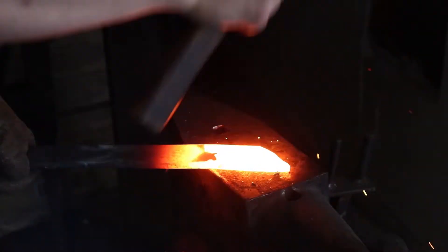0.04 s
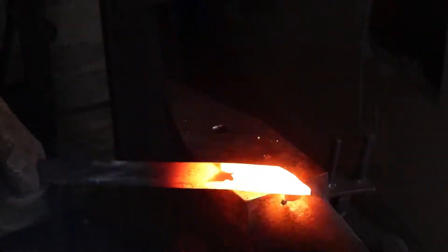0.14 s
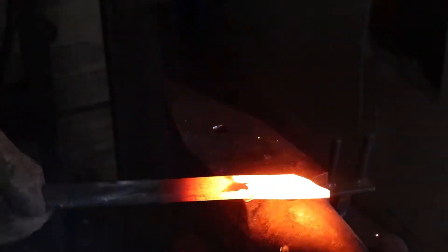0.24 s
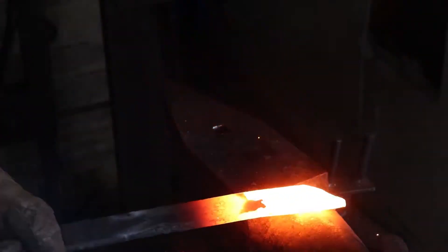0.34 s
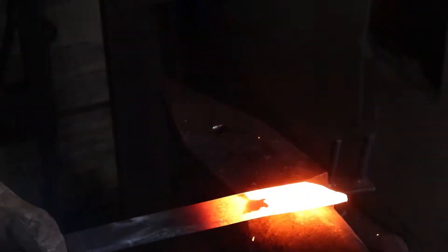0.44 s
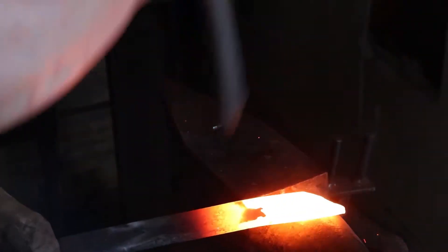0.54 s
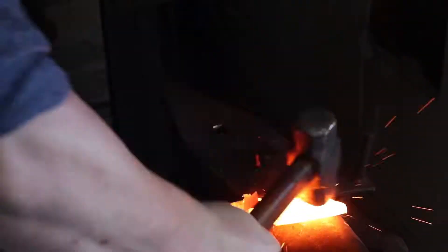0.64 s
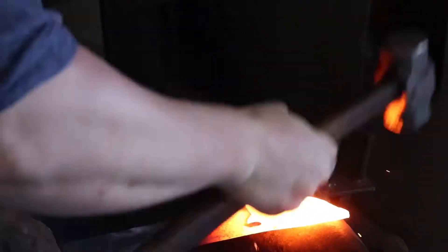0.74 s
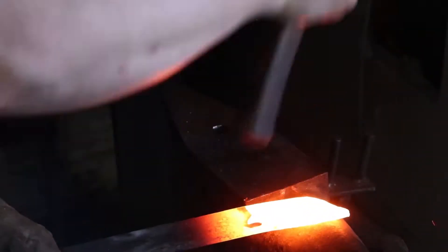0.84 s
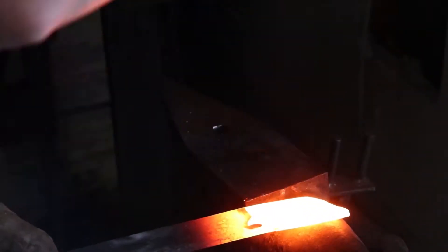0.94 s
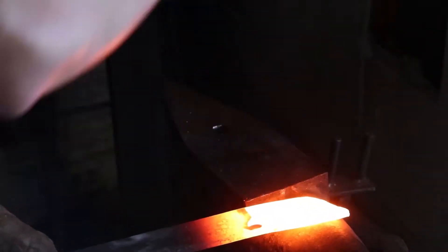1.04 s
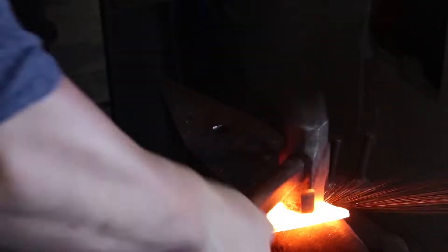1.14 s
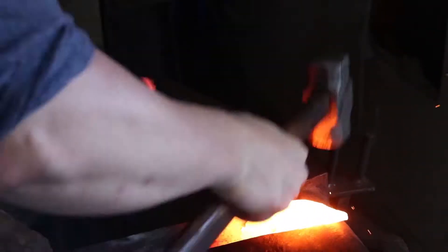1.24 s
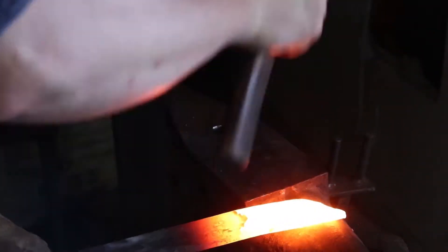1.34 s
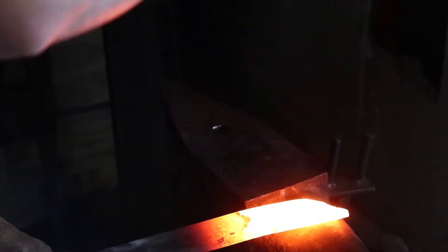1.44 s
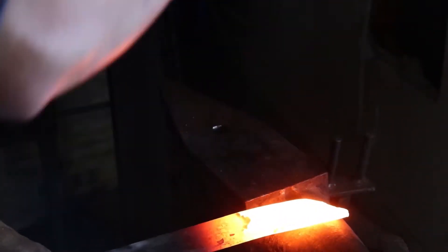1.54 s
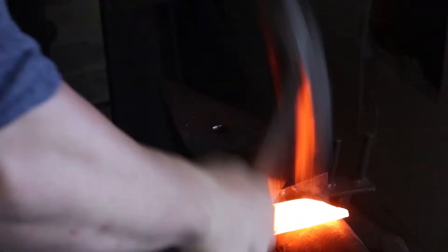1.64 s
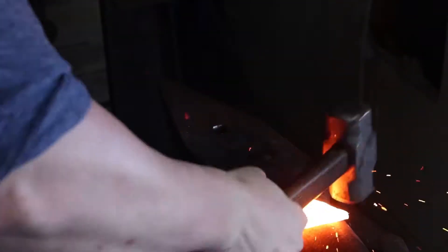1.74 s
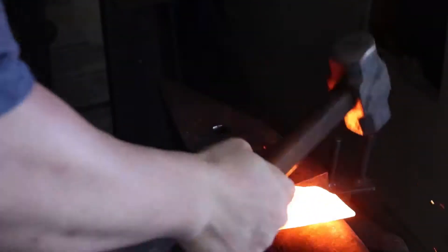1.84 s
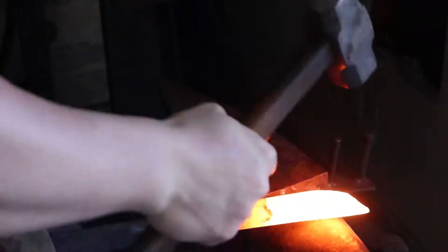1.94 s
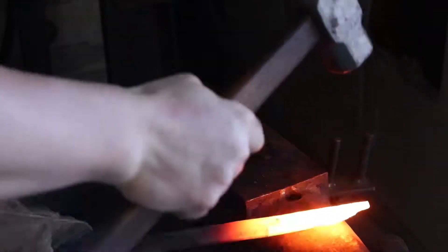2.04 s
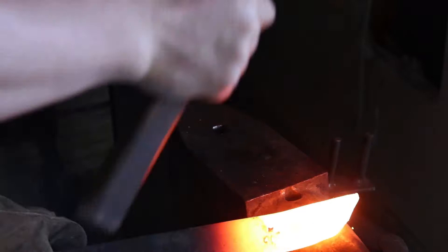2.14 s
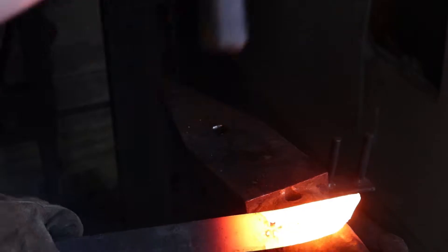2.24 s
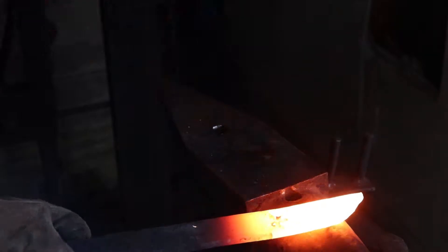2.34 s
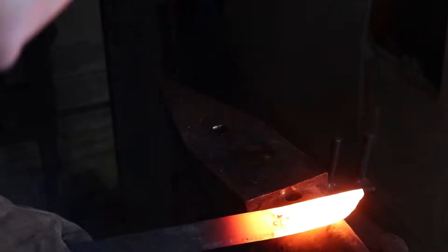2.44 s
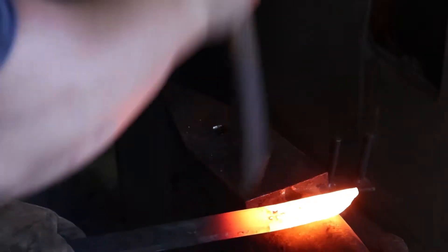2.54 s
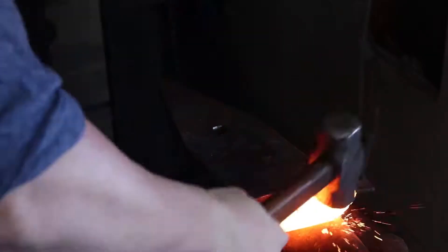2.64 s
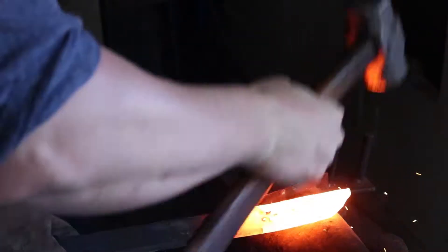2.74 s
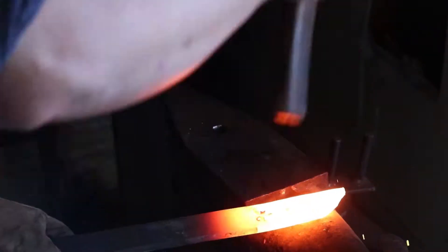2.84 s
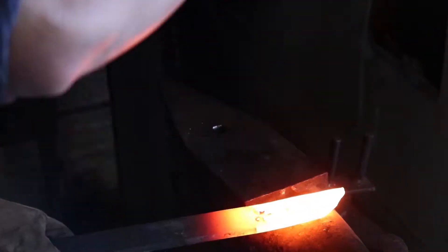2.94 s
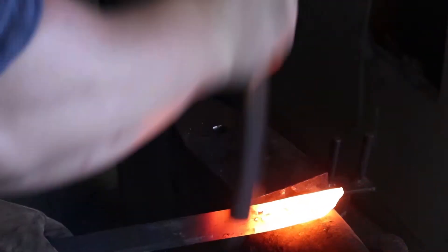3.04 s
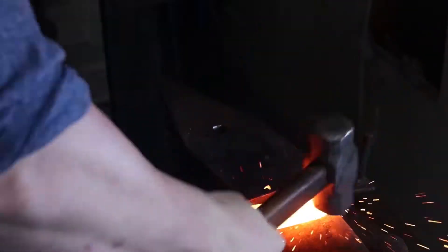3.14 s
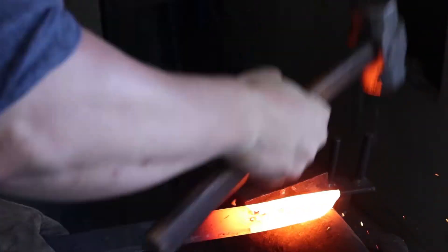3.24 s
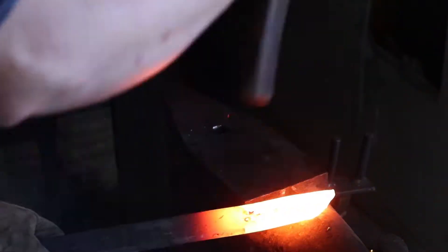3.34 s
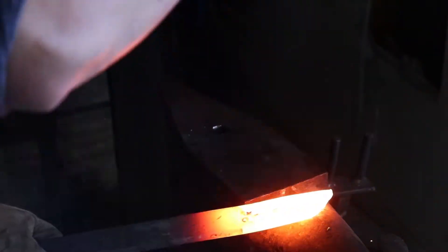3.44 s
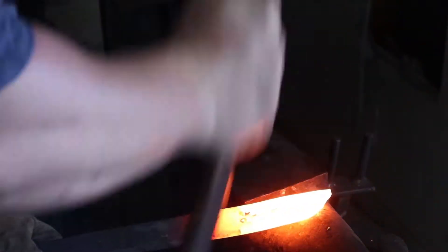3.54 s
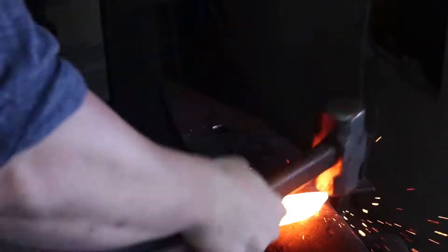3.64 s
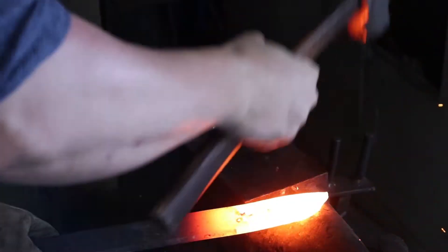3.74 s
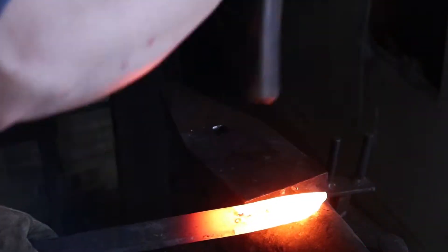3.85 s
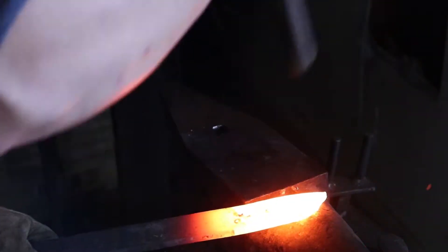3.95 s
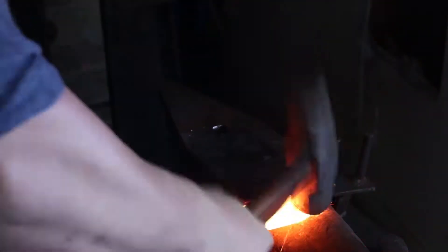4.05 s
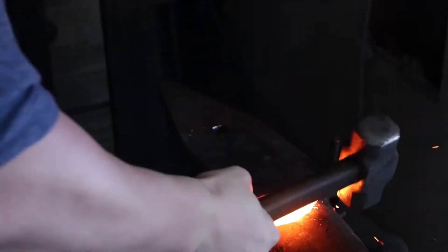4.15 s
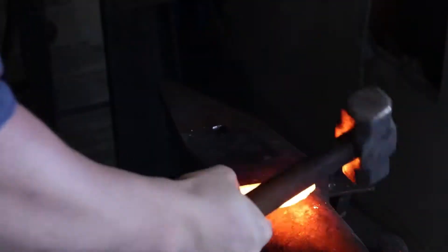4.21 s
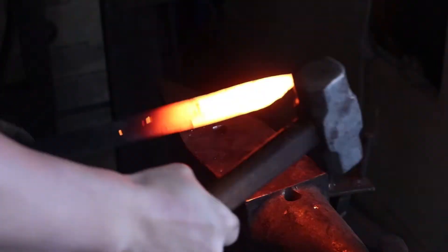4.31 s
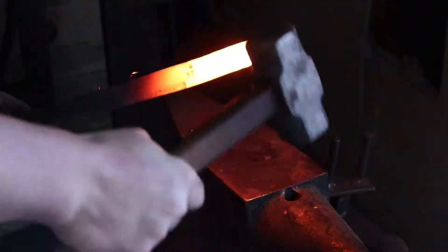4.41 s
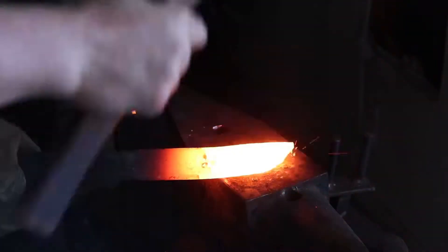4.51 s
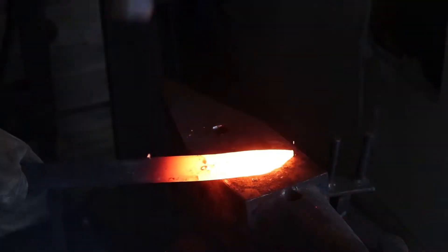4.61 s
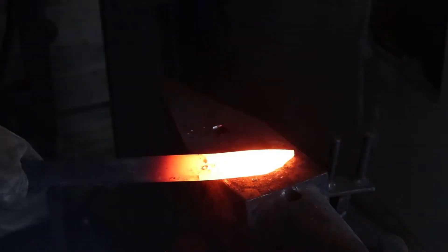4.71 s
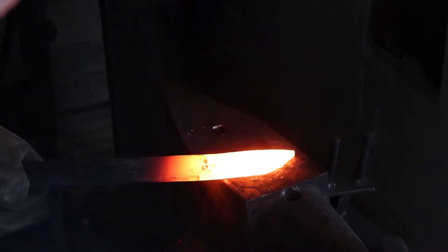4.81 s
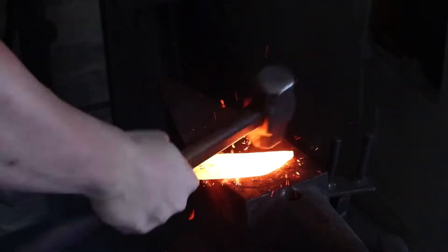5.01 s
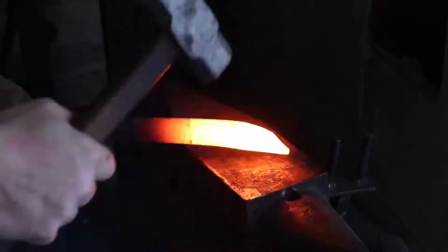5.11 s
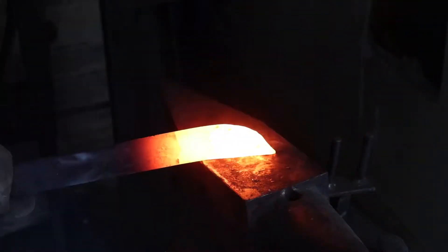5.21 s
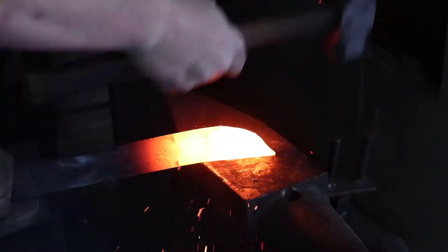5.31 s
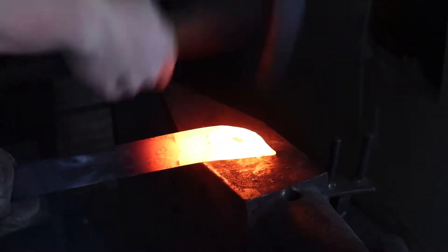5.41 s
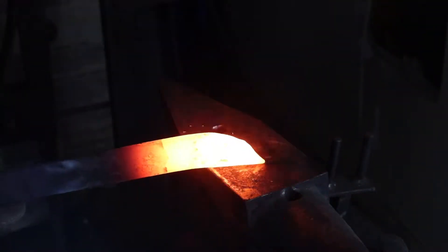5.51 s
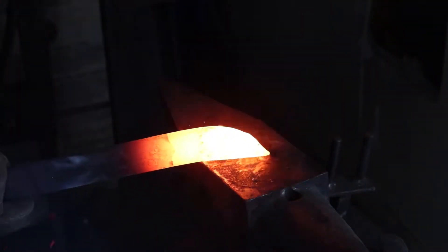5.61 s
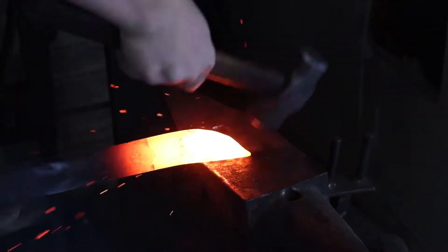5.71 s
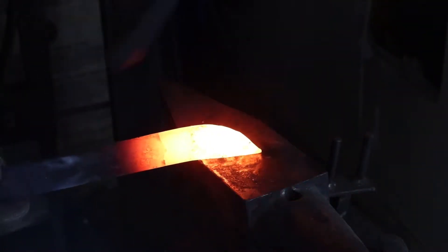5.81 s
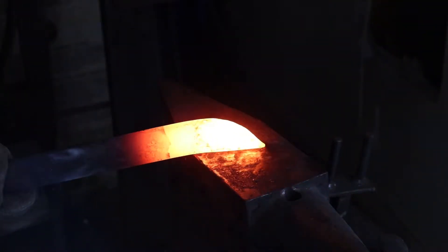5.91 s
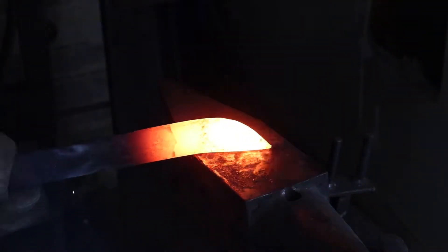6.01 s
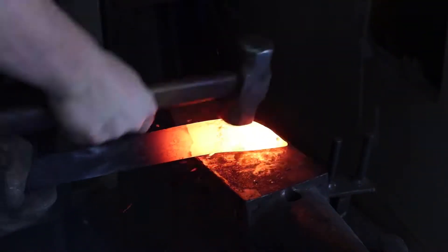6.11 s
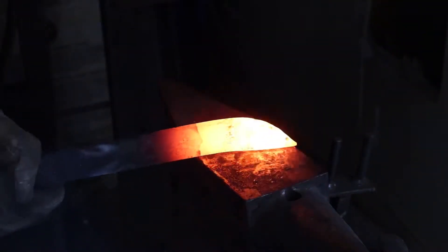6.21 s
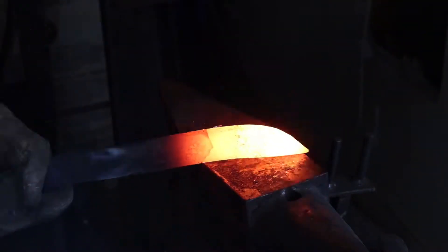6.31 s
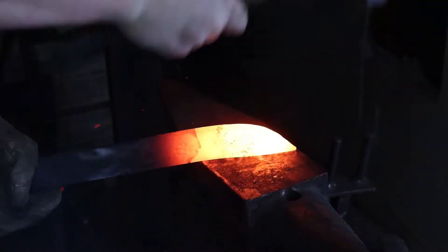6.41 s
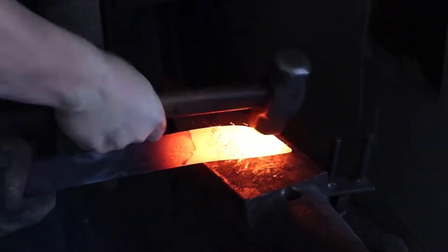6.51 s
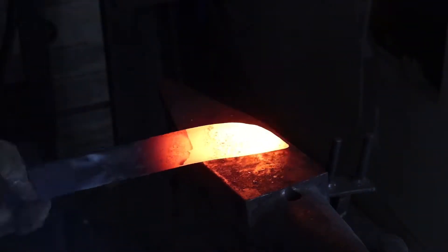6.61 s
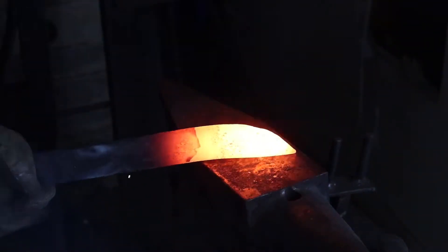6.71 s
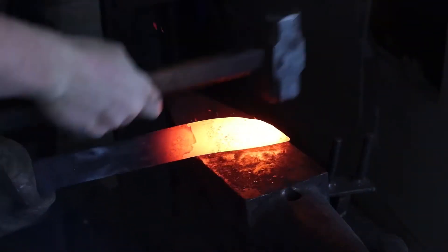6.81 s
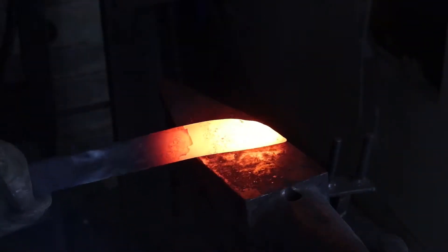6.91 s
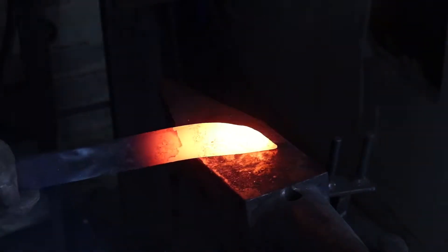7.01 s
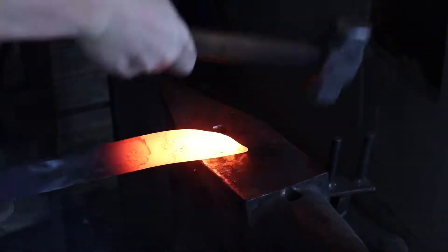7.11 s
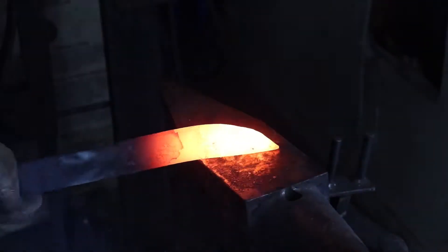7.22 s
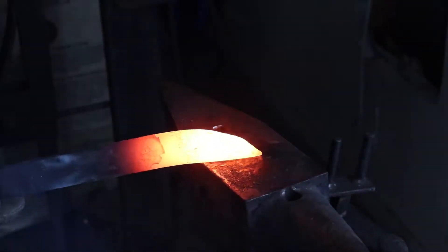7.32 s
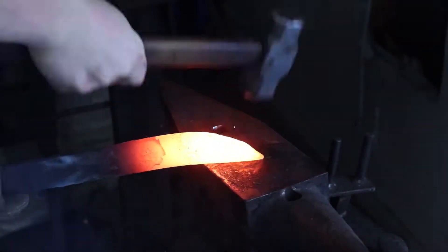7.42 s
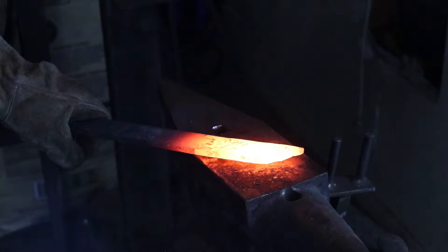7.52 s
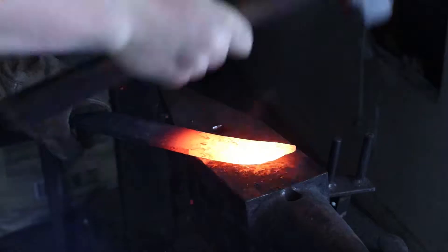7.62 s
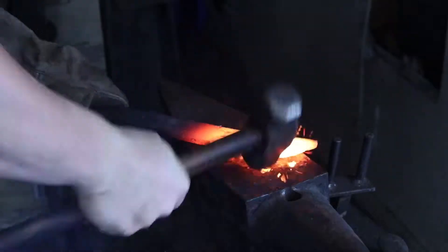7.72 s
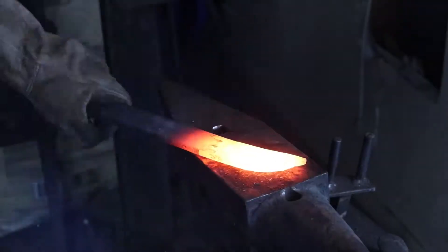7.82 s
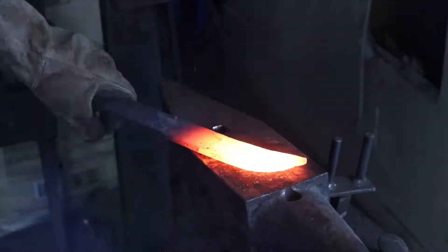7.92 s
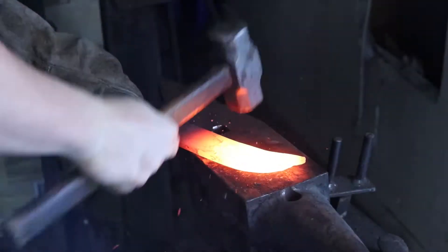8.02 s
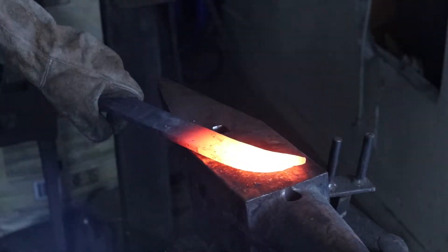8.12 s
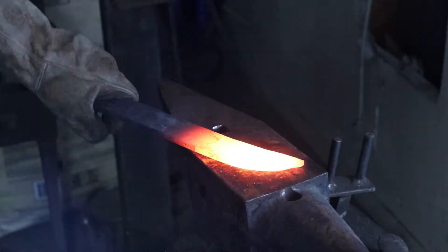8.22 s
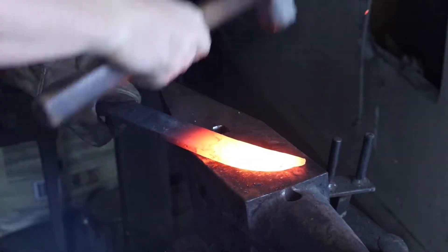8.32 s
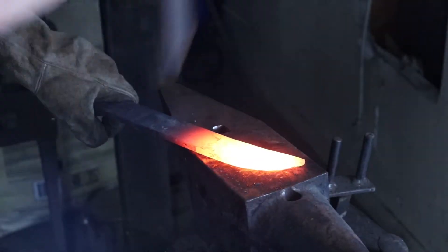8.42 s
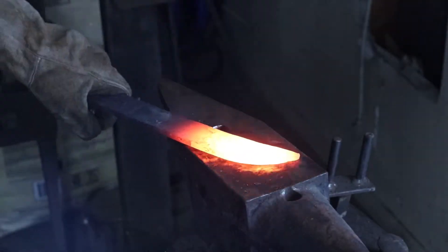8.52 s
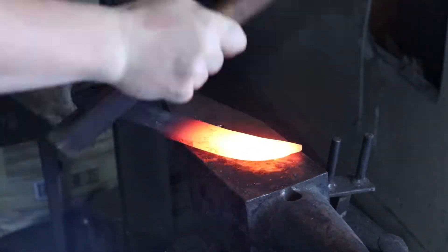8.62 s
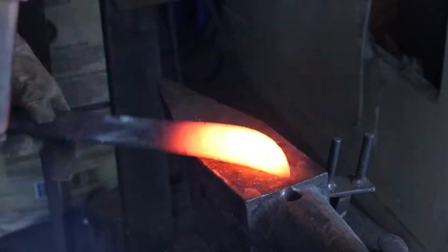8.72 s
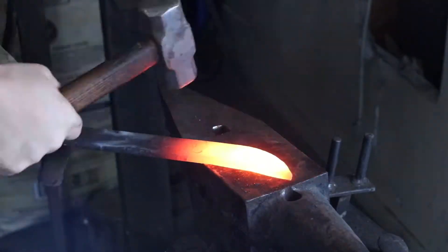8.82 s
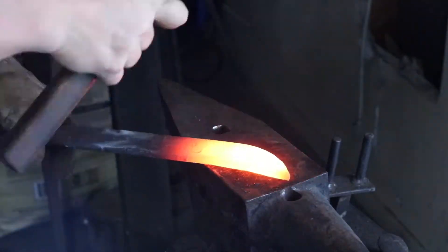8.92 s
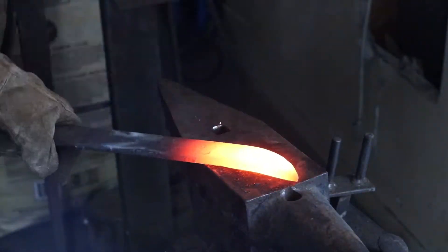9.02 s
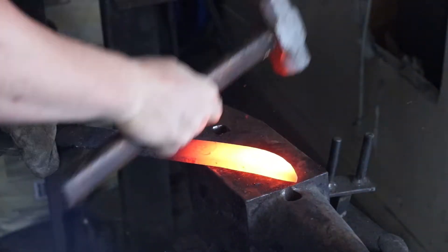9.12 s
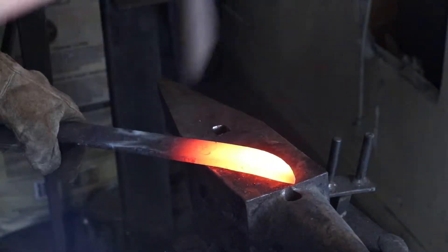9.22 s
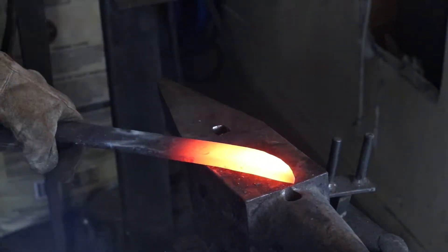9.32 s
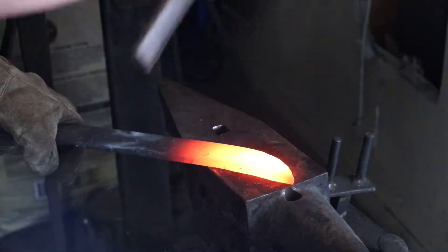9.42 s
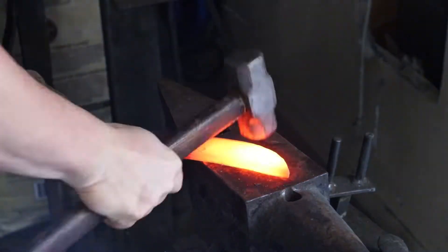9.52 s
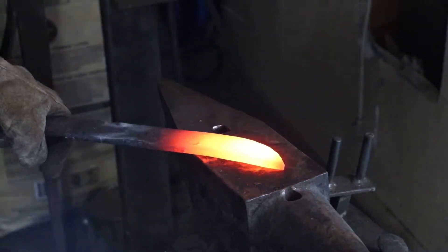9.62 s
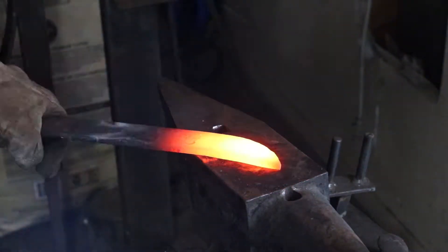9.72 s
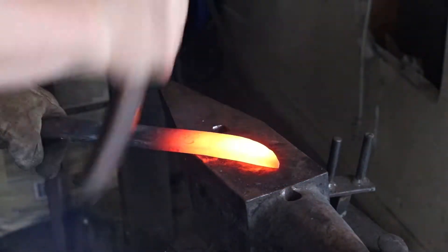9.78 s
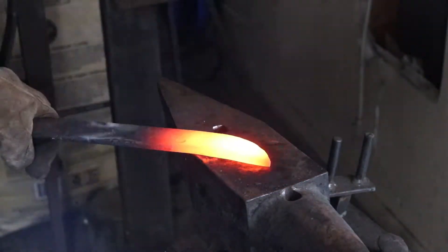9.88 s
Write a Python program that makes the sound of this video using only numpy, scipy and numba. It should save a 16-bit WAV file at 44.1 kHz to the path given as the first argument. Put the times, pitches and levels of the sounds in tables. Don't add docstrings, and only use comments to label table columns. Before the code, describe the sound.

In a hard-walled smithy, slow clipped hammer blows and light anvil taps give way halfway to a fast-forward rattle of short, sharp metallic strikes.

```python
import sys
import numpy as np
from scipy import signal
from scipy.fft import rfft, irfft
from scipy.io import wavfile
from scipy.ndimage import map_coordinates
from numba import njit

SR = 44100
rng = np.random.default_rng(int(sys.argv[2]) if len(sys.argv) > 2 else 0)


def decibels_to_gain(level_db):
    exponent = np.asarray(level_db, float) / 20
    return 10 ** exponent


def put_to_file(sound):
    columns = np.atleast_2d(sound).T
    safe = np.clip(columns, -1, 1)
    whole_steps = np.round(safe * 32767)
    wavfile.write(sys.argv[1], SR, whole_steps.astype(np.int16))


N = 438794
FAST_FROM_S, FAST_SPEED = 4.93, 4.013

# (frequency [Hz], level [dB per Hz])
BLOWER_COLOUR = [(12, -38), (25, -22.5), (53, -17), (168, -26), (285, -11.5), (399, -12), (642, -16),
                 (949, -21), (1660, -30), (1960, -26), (2320, -28), (11100, -47), (16000, -55)]
# (time [s], level [dB])
BLOWER_LEVEL = [(0, -20.5), (.6, -32), (2.5, -29.5), (4.6, -29), (5, -29), (10, -30.5)]
# (frequency [Hz], width [Hz], boost [dB])
PIPE_RESONANCES = [(150, 6.9, 9.5), (189, 7.8, 11.5), (211, 4, 9.5), (235.6, 3.3, 12.5), (258, 2.5, 7.5),
                   (288.2, 5, 5.5), (543, 4, 9), (633.6, 4.4, 8), (640.7, 3.6, 11)]
PUFF_S, PUFF_DB, PUFF_RISE_S, PUFF_FALL_S = 1.2, 7.5, 0.27, 0.015

# (frequency [Hz], likeness [0-1])
STEREO_LIKENESS = [(60, 0.99), (290, 0.94), (640, 0.77), (1400, 0.26), (3000, 0.0029), (15000, 0.022)]
# (frequency [Hz], t60 [s])
WALL_DECAY = [(100, 0.62), (500, 0.81), (1500, 0.73), (4000, 0.58), (8000, 0.48), (16000, 0.39)]
# (frequency [Hz], level [dB], t60 [s])
STANDING_WAVES = [(111.6, -9.5, 0.54), (143, -4, 0.49), (180.3, -9.5, 0.65), (210, -5.5, 0.59),
                  (231, -1.5, 0.55), (256.7, -1.5, 0.52), (280, -0.5, 0.63), (442.4, -3.5, 0.61),
                  (549, -4.5, 0.79), (626, 0, 0.64), (628, -8, 0.39), (754, -9.5, 0.74), (761, -4, 0.57),
                  (1155, -2, 0.44)]
STANDING_DB, STANDING_BUILD_S = -42, 0.02
SHARED_ECHO = 0.57

# (time [s], peak level [dB], frequency [Hz])
KNOCKS = [
    (1.099, -9.5, 476),
    (1.157, -18, 445),
    (1.219, -41, 363),
    (2.56, -24.5, 303),
]

# (time [s], peak level [dB], anvil ring [dB], bar ring [dB], brightness [dB per octave])
TAPS = [(0.434, -5.5, 2, -5, -4.5), (0.629, 0.5, 6.5, 1, 0.5), (2.186, -1, 6, -1.5, 0.5),
        (2.299, -28, 2, -1, 0), (4.6147, 8, -23, -4, -1.3), (5.16, -6, -15, 13, -1),
        (5.2234, 2.5, 4, 4, -3), (7.5491, 4, -1, -1, -3), (8.699, 13, -12, -17, 32),
        (8.7934, 9, -19, -4, 4), (8.843, -5.5, -19, 11, -1), (1.099, -16, -20, 1, -1)]
# (frequency [Hz], level [dB per Hz])
CLINK_COLOUR = [(180, -96), (300, -16.5), (842, -2), (946, -1), (1690, -3), (2570, 3.5), (4300, 4),
                (12500, -21.5), (16000, -58)]
# (frequency [Hz], level [dB], t60 [s])
BAR_MODES = [(1850, -8, .06), (2250, -11, .06), (2900, -9, .07), (3320, -11, .06), (3580, -11, .06),
             (3790, -11, .07), (4377, -11, .07), (6126, -20, .05)]
# (frequency [Hz], level [dB], t60 [s])
BAR_OVERTONES = [(5530, -20.5, 0.068), (6650, -17, 0.048), (7250, -23, 0.077), (7480, -40, .07)]
# (frequency [Hz], level [dB], t60 [s])
BAR_LOW_MODES = [(1170, -16, .018), (1600, -12, 0.022), (1930, 1, 0.032), (2140, 5, .02)]
BAR_TILT = 0.49
OVERTONE_DB, OVERTONE_PER_FORCE = -24, 1.15
DULL_DB, DULL_PER_TILT = -44, 4.6

# (frequency [Hz], level [dB], t60 [s])
STRONG_SINGING = [(12086, 5, .85), (12089, -3, .85)]
# (frequency [Hz], level [dB], t60 [s])
FAINT_SINGING = [(9109, 0, 1.2), (11090, -2, 1.2)]
# (frequency [Hz], level [dB], t60 [s])
FAINT_THIRD = [(10800, -9, 0.99)]
# (strong modes [dB], faint modes [dB])
WOKEN = [(-12, -55), (-29, -57), (-20, -55), (-8, -43), (-33, -63), (-14, -57), (-56, -31), (-7.5, -56)]
SWELL_S = 0.15
WANDER_S, WANDER_KNOTS_PER_S = 4e-5, 16.5

# (peak level [dB], main ring [dB], upper rings [dB], brightness [dB per octave])
EARLIER_BLOW = (18.5, -18, 20, 5)
EARLIER_S = -0.24
# (time [s], peak level [dB], main ring [dB], upper rings [dB], brightness [dB per octave])
FLAT_BLOWS = [(0.734, -3.5, -14.5, 12.5, -0.5), (1.255, 0.5, -8, -9, -0.6), (1.767, 4, -4, -20, 0.24),
              (2.73, 1, -11.5, -60, -0.5), (3.216, 1.5, 0, -9, -0.5), (3.701, 1, -9.5, -4, -0.7),
              (4.161, 3, -1.5, 2, -0.2)]
# (time [s], peak level [dB], main ring [dB])
FIRST_EDGE_BLOWS = [(4.951, -4.5, -9.5), (5.077, -0.5, 0.5), (5.357, -4.5, -9), (5.489, -3, -10),
                    (5.624, -6.5, -12.5), (5.762, -3.5, -9.5), (5.899, -2.5, -9.5), (6.037, -4, -1.5),
                    (6.171, -2, -16), (6.309, -4, -17), (6.447, -1.5, -18), (6.584, -2, -8.5),
                    (6.724, -3.5, -15.5), (6.869, -3.5, -11), (7.016, -2, -6), (7.161, -4, -11.5),
                    (7.31, -2, -8.5), (7.457, -1.5, -7)]
# (time [s], peak level [dB], main ring [dB])
MORE_EDGE_BLOWS = [(7.647, -9.5, -12.5), (7.787, -6.5, -16), (7.929, -1, -3), (8.074, 0.5, -1.5),
                   (8.216, -2.5, -5.5), (8.361, 1, -3), (8.506, 2, 2.5), (8.649, -2, 3), (9.168, -1.5, 3),
                   (9.307, -1, -1), (9.447, -1, 3.5), (9.585, -1.5, 5), (9.729, -0.5, 1.5),
                   (9.869, -8, 0.5)]
# (frequency [Hz], level [dB per Hz])
FLAT_CRASH = [(40, -57), (70, -26.5), (220, -10.5), (440, -13), (700, -4.5), (1100, -9), (1550, -5),
              (2300, -8.5), (3200, -9), (4500, -10), (7000, -12.5), (11800, -30), (14200, -32),
              (16000, -100)]
# (frequency before speed-up [Hz], level [dB per Hz])
EDGE_CRASH = [(20, -37), (60, -25.5), (130, -15), (250, -6.5), (400, -16), (600, -5.5), (780, -7.5),
              (950, -10), (1170, -6), (1390, -9.5), (2100, -11.5), (2900, -8.5), (3900, -12.5), (4000, -50)]
# (frequency [Hz], level [dB], t60 [s])
HORN_MODES = [(2568, 1, .2), (2545, -9, .14), (2596, -10, .14)]
# (frequency [Hz], level [dB], t60 [s])
BODY_MODES = [(253, -20, 0.3), (557, -46, 0.21), (654, -8.5, 0.083), (1370, -8.5, 0.042), (1520, -2, 0.021),
              (1830, -10, 0.025)]
# (frequency [Hz], level [dB], t60 [s])
EDGE_MODES = [(247, -14.5, 0.085), (659, -5, 0.096), (799, -14, 0.085), (1233, -5, 0.061),
              (1400, -12, 0.05), (1664, -6, 0.044), (3095, 0, 0.067), (1845, -6.5, 0.031),
              (2280, -37, 0.035)]
# (frequency [Hz], level [dB], t60 [s])
UPPER_MODES = [(3091, -11.5, 0.13), (3684, -6, 0.052), (4710, -5, 0.047), (6130, -11, 0.11)]
BLOW_LENGTH_S = 1.4
EDGE_FORCE_DB = 2
EDGE_BRIGHT_DB, BRIGHT_PER_RING = 2.17, 0.14
EDGE_UPPER_DB, UPPER_PER_RING = 8.5, 0.49

LIMIT_DB, SQUEEZE = -23.5, 0.92
LATE_SLOW_S, LATE_FAST_S = 0.014, 0.016


def along(points, hz):
    f, value = np.transpose(points)
    return np.interp(np.log(hz + 1), np.log(f + 1), value)


def speed_at(s):
    return np.where(s < FAST_FROM_S, 1.0, FAST_SPEED)


def true_time(seconds, speed):
    return np.arange(int(seconds * SR / speed)) / SR * speed


def add(out, s, heard):
    start = round(s * SR)
    stop = round(FAST_FROM_S * SR) if s < FAST_FROM_S else N
    heard = heard[:, max(-start, 0):stop - start]
    out[:, max(start, 0):][:, :heard.shape[1]] += heard


def diffuse(n, speed, shape, size=256):
    hz, t, (a, b) = signal.stft(rng.standard_normal((2, n)), SR, nperseg=size)
    hz = hz[:, None] / speed
    turn = np.arccos(np.clip(along(STEREO_LIKENESS, hz), -1, 1)) / 2
    left = np.cos(turn) * a + np.sin(turn) * b
    right = np.cos(turn) * a - np.sin(turn) * b
    shaped = np.array([left, right]) * shape(hz, t * speed)
    return signal.istft(shaped, SR, nperseg=size)[1][:, :n]


def ring(modes, t, speed, db, longest=0.13):
    total = 0
    for hz, level, t60 in modes:
        strength = db + level + 2 * rng.normal()
        audible = hz * speed < 16000
        total = total + decibels_to_gain(strength - 60 * t / min(t60, longest)) * np.sin(2 * np.pi * hz * t) * audible
    return total


def crash(spectrum, tilt_db, n, speed):
    hz = np.fft.rfftfreq(2048, 1 / SR) / speed
    colour_db = along(spectrum, hz) + tilt_db * np.log2(hz / 1500 + 0.031)
    cepstrum = irfft(np.log(decibels_to_gain(colour_db) + 1e-6))
    cepstrum[1:1024] *= 2
    cepstrum[1025:] = 0
    pulse = irfft(np.exp(rfft(cepstrum)))
    return np.pad(pulse / np.linalg.norm(pulse), (0, n - 2048))


def nearby(speed, spread_db, direct_db=-4):
    t = true_time(0.08, speed)
    centre = rng.standard_normal(len(t))
    sides = decibels_to_gain(spread_db) * rng.standard_normal((2, len(t)))
    near = (centre + sides) * decibels_to_gain(-60 * t / 0.033)
    near /= np.linalg.norm(near[0])
    near[:, 0] = decibels_to_gain(direct_db)
    return near


def echo(n, speed):
    t = np.arange(n) / SR * speed
    decay = diffuse(n, speed, lambda hz, t: decibels_to_gain(-60 * t / along(WALL_DECAY, hz)))
    walls = decay * (1 - np.exp(-t / 0.02))
    return walls / np.linalg.norm(walls[0])


def workshop(source, speed, near, wet_db, usual=0, same=0):
    n = len(source)
    path = decibels_to_gain(wet_db) * (np.sqrt(1 - same ** 2) * echo(n, speed) + same * usual)
    path[:, :near.shape[1]] += near
    return signal.fftconvolve(source[None], path, axes=1)[:, :n]


def blower():
    s, cut = np.arange(N) / SR, round(FAST_FROM_S * SR)

    def colour(hz, t):
        pipe_db = sum(db / (1 + ((hz - centre) / width) ** 2) for centre, width, db in PIPE_RESONANCES)
        return decibels_to_gain(along(BLOWER_COLOUR, hz) + pipe_db)

    parts = [diffuse(n, speed, colour, size=8192) for n, speed in ((cut, 1), (N - cut, FAST_SPEED))]
    air = np.hstack([part / np.std(part) for part in parts])
    lumps_db = map_coordinates(rng.standard_normal(400), [np.cumsum(speed_at(s)) * 12 / SR])
    puff_db = PUFF_DB * np.exp(-abs(s - PUFF_S) / np.where(s < PUFF_S, PUFF_RISE_S, PUFF_FALL_S))
    return air * decibels_to_gain(np.interp(s, *np.transpose(BLOWER_LEVEL)) + puff_db + lumps_db)


def stand():
    out, t = np.zeros((2, N)), np.arange(SR // 2) / SR
    for s, db, hz in KNOCKS:
        knock = ring([(hz, -0.1, 0.09), (1.2 * hz, -8, 0.05)], t, 1, db - 3)
        near = nearby(0.71, spread_db=-4, direct_db=-13)
        add(out, s, workshop(knock, 0.73, near, wet_db=0))
    return out


def taps():
    out = np.zeros((2, N))
    for s, db, anvil_db, bar_db, tilt_db in TAPS:
        speed = float(speed_at(s))
        t = true_time(0.9, speed)
        bar = [(hz, level + BAR_TILT * tilt_db * np.log2(hz / 2800), t60) for hz, level, t60 in BAR_MODES]
        source = crash(CLINK_COLOUR, tilt_db, len(t), speed) / np.sqrt(speed)
        source += ring(HORN_MODES, t, speed, anvil_db - 36, longest=0.45)
        source += ring(bar, t, speed, bar_db - 25.5)
        source += ring(BAR_OVERTONES, t, speed, OVERTONE_DB + OVERTONE_PER_FORCE * db)
        source += ring(BAR_LOW_MODES, t, speed, DULL_DB - DULL_PER_TILT * tilt_db)
        near = nearby(speed, spread_db=4, direct_db=-7)
        add(out, s, decibels_to_gain(14.5 + 1.28 * db) * workshop(source, speed, near, wet_db=0))
    return out


def singing():
    out, t = np.zeros((2, N)), np.arange(2 * SR) / SR
    swell = 1 - np.exp(-(t / SWELL_S) ** 2)
    times = [EARLIER_S, *np.transpose(FLAT_BLOWS)[0]]
    for s, (strong_db, faint_db) in zip(times, WOKEN):
        swing = t + WANDER_S * map_coordinates(rng.standard_normal(100), [t * WANDER_KNOTS_PER_S])
        sides = []
        for lag in (0, 1.5e-5):  # left, right [s]
            strong = ring(STRONG_SINGING, swing - lag, 1, strong_db, longest=3)
            faint = ring([*FAINT_SINGING, *FAINT_THIRD], t - lag, 1, faint_db, longest=3)
            sides.append(strong + faint)
        add(out, s, np.array(sides) * swell)
    return out


def blows():
    edge = []
    for s, db, main_db in [*FIRST_EDGE_BLOWS, *MORE_EDGE_BLOWS]:
        upper_db = EDGE_UPPER_DB + UPPER_PER_RING * main_db
        tilt_db = EDGE_BRIGHT_DB + BRIGHT_PER_RING * main_db
        edge.append((s, db + EDGE_FORCE_DB, main_db, upper_db, tilt_db))
    return [(EARLIER_S, *EARLIER_BLOW), *FLAT_BLOWS, *edge]


def hammer():
    out = np.zeros((2, N))
    near = {speed: nearby(speed, spread_db=-5) for speed in (1, FAST_SPEED)}
    usual = {speed: echo(int(BLOW_LENGTH_S * SR / speed), speed) for speed in (1, FAST_SPEED)}
    for s, db, main_db, upper_db, tilt_db in blows():
        speed = float(speed_at(s))
        t = true_time(BLOW_LENGTH_S, speed)
        colour, body = (FLAT_CRASH, BODY_MODES) if s < FAST_FROM_S else (EDGE_CRASH, EDGE_MODES)
        source = crash(colour, tilt_db, len(t), speed) / np.sqrt(speed)
        source += ring(HORN_MODES, t, speed, main_db - 27, longest=0.45)
        source += ring(body, t, speed, -32.5)
        source += ring(UPPER_MODES, t, speed, upper_db - 54.5)
        room = ring(STANDING_WAVES, t, speed, STANDING_DB, longest=3) * (1 - np.exp(-t / STANDING_BUILD_S))
        heard = workshop(source, speed, near[speed], wet_db=3, usual=usual[speed], same=SHARED_ECHO)
        add(out, s, decibels_to_gain(32.5 + 1.02 * db) * (heard + room))
    return out


def scene():
    return hammer() + singing() + taps() + stand() + blower()


@njit
def follow(goal, speed, fall, rise, steepest):
    out, now = np.empty_like(goal), goal[0]
    for i in range(len(goal)):
        now += max((goal[i] - now) * (fall if goal[i] < now else rise), -steepest) * speed[i]
        out[i] = now
    return out


def band_limit(x):
    return signal.sosfilt(signal.butter(12, 16410, fs=SR, output="sos"), x)


def record(dry):
    speed = speed_at(np.arange(N) / SR)
    true_s = np.cumsum(speed) / SR
    squares = np.mean(dry ** 2, axis=0)
    squares[0] = squares[:SR // 100].mean()
    power = follow(squares, speed, 1 / (0.003 * SR), 1 / (0.021 * SR), np.inf)
    over_db = np.maximum(10 * np.log10(power + 1e-12) - LIMIT_DB, 0)
    slide_db = follow(-SQUEEZE * over_db, speed, 1 / (0.0068 * SR), 1 / (0.011 * SR), 2800 / SR)
    lag_s = np.where(speed > 1, LATE_FAST_S, LATE_SLOW_S)
    late_db = np.interp(true_s - lag_s, true_s, slide_db)
    jump_db = np.interp(true_s + 0.0069, true_s, over_db) - over_db
    flinch_db = np.clip(2 * (jump_db - 9), 0, 11)
    clipped = np.clip(dry * decibels_to_gain(late_db - flinch_db), -1, 1)
    leak = 2 * np.pi * 22 / SR
    drift = [follow(side, speed, leak, leak, np.inf) for side in clipped]
    smooth = signal.lfilter(*signal.butter(2, 16500 / (SR / 2)), clipped - drift)
    return band_limit(np.clip(smooth, -1, 1))


dry = scene()
out = record(dry)
put_to_file(out)
```